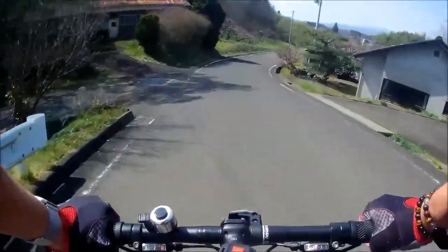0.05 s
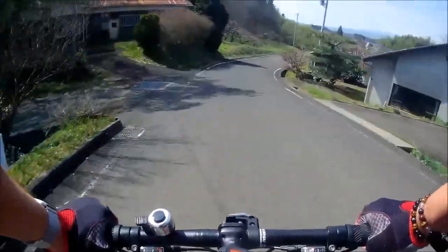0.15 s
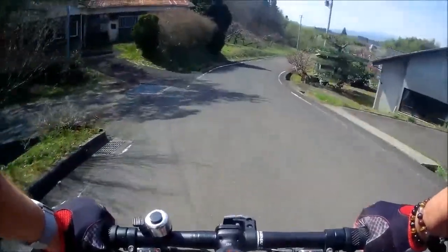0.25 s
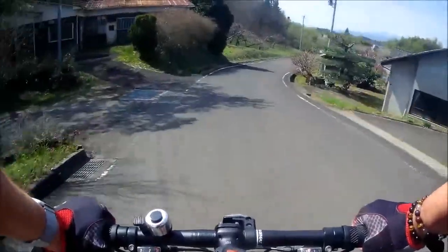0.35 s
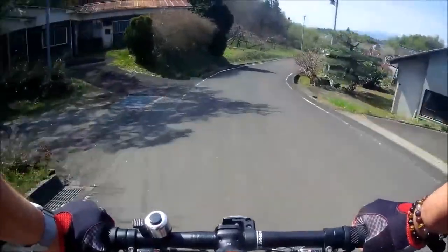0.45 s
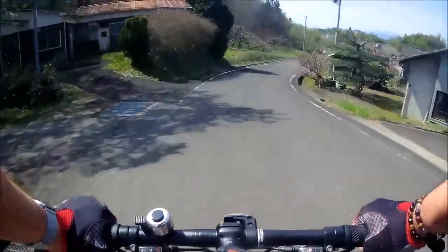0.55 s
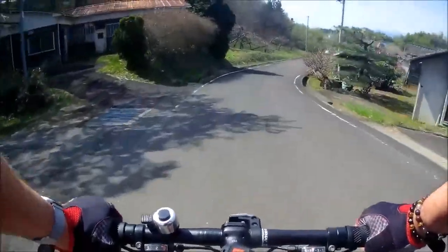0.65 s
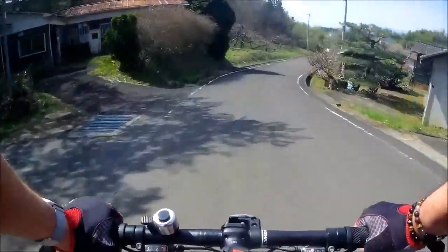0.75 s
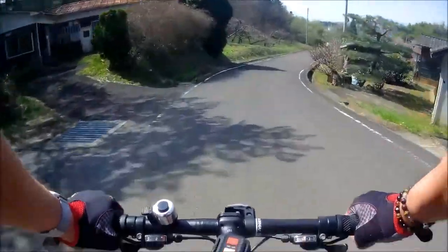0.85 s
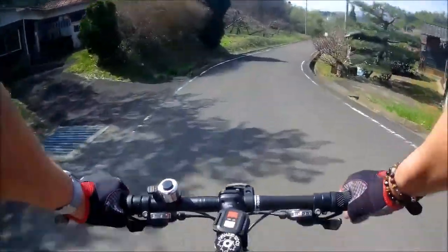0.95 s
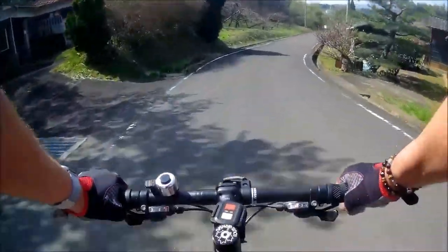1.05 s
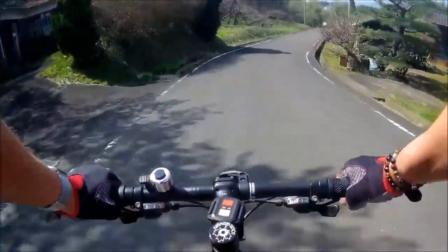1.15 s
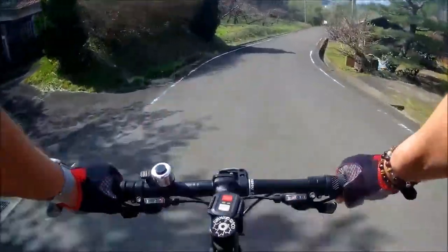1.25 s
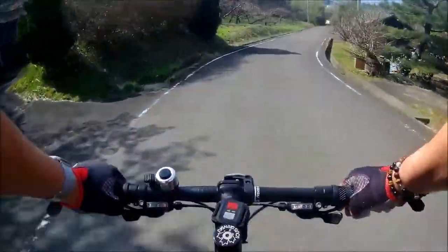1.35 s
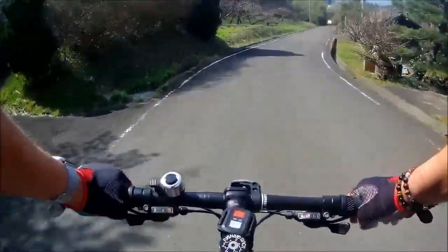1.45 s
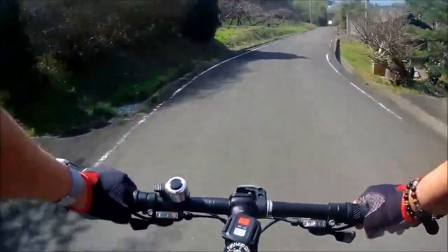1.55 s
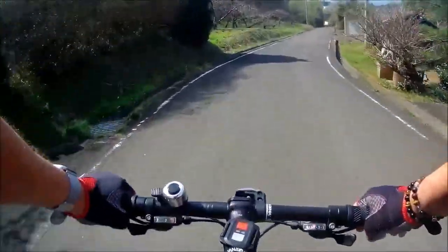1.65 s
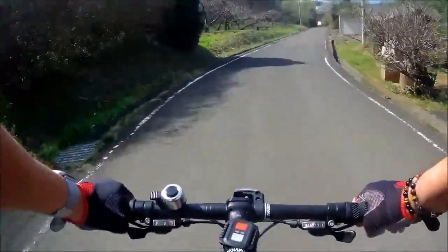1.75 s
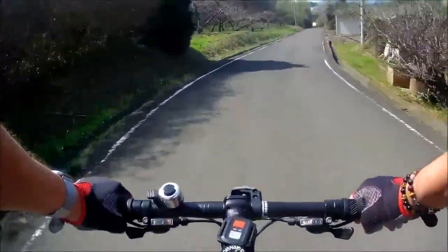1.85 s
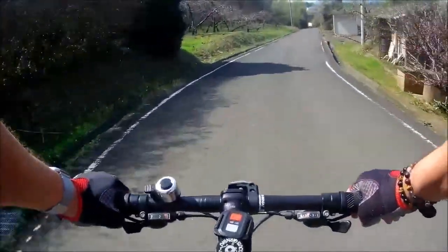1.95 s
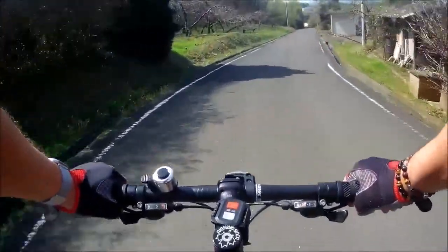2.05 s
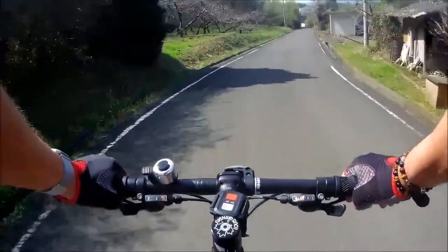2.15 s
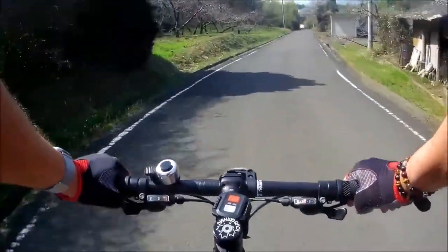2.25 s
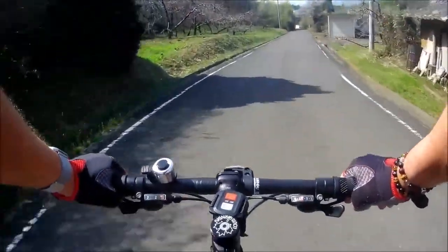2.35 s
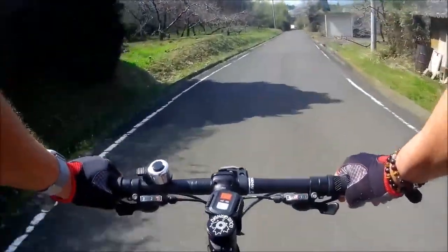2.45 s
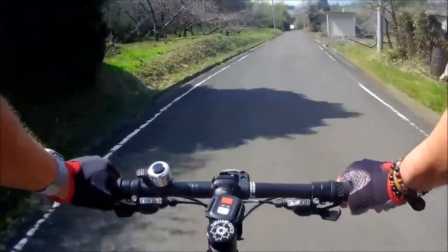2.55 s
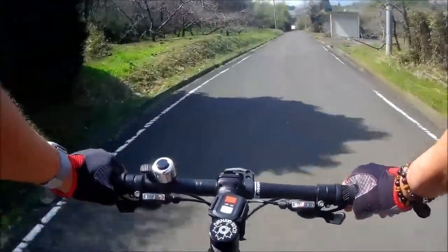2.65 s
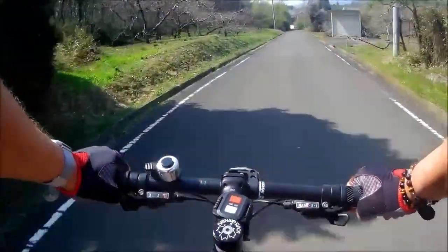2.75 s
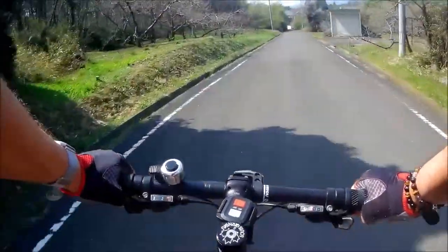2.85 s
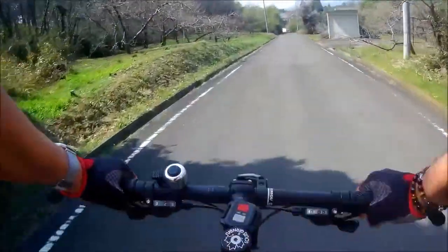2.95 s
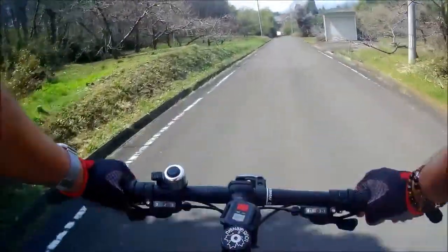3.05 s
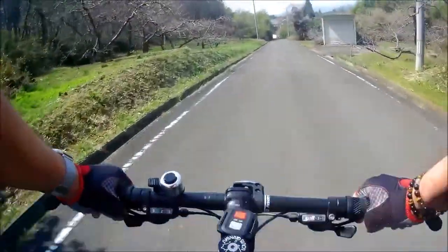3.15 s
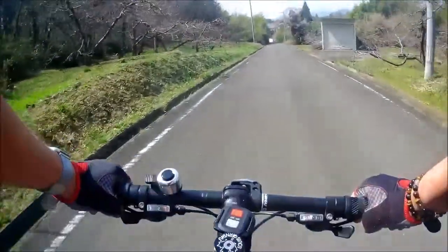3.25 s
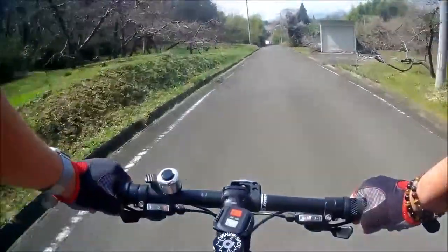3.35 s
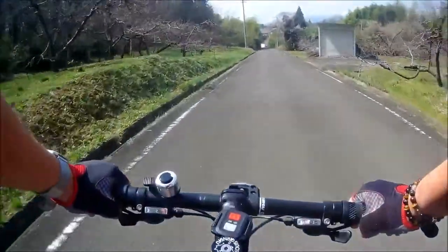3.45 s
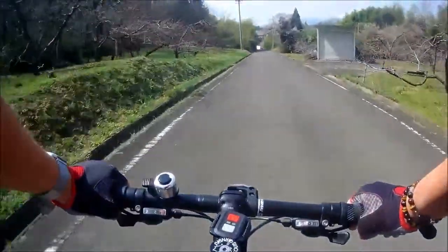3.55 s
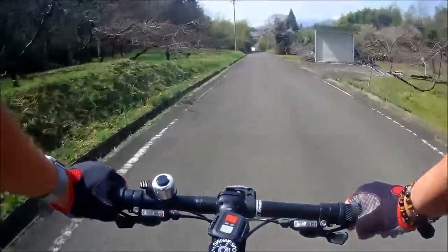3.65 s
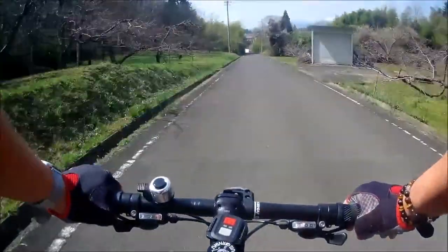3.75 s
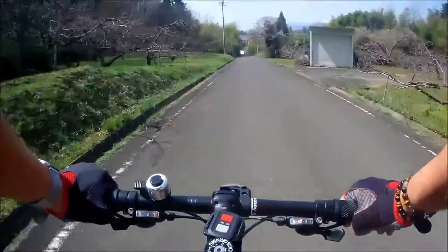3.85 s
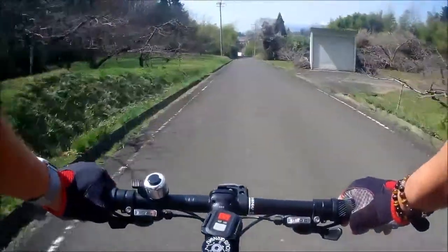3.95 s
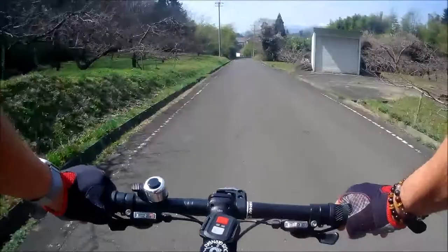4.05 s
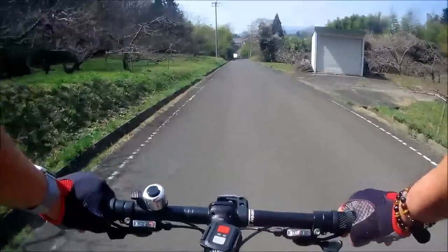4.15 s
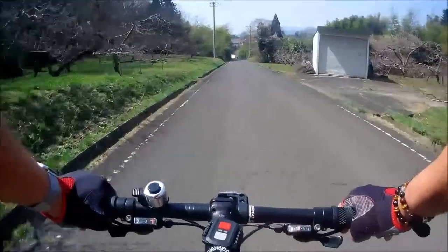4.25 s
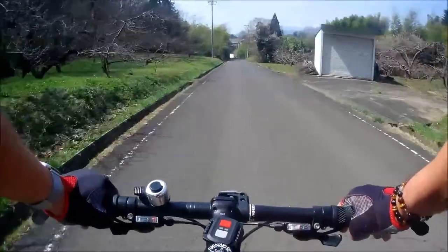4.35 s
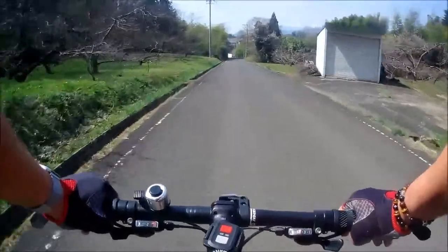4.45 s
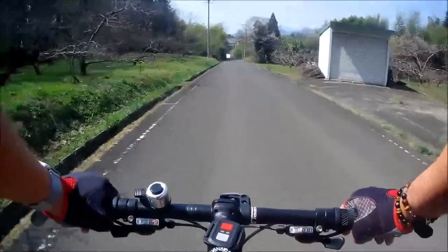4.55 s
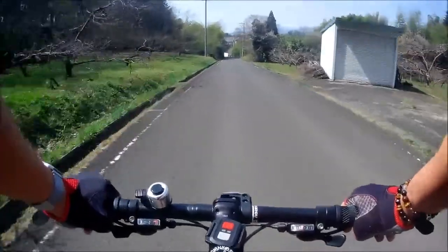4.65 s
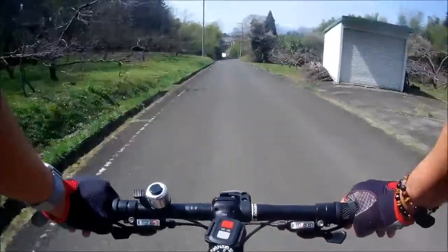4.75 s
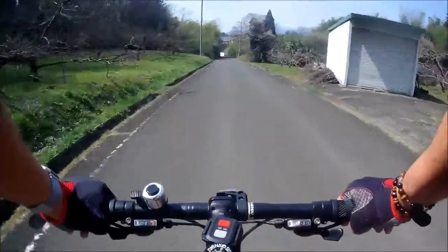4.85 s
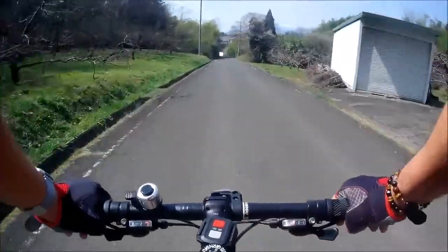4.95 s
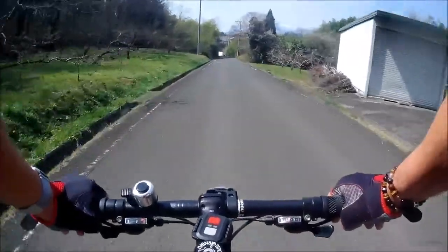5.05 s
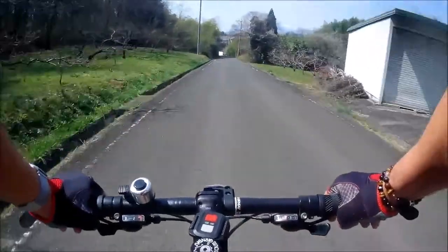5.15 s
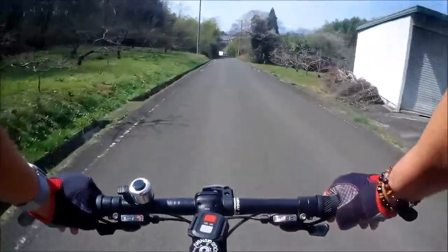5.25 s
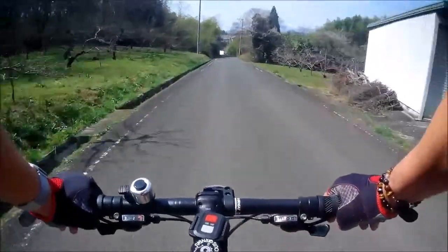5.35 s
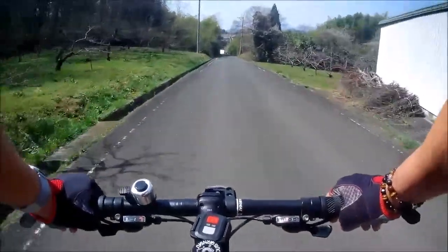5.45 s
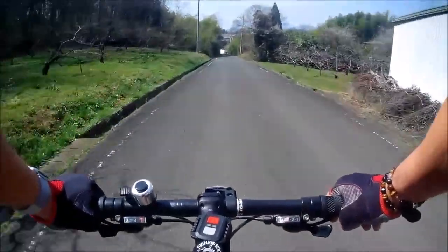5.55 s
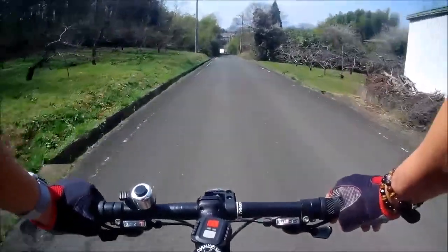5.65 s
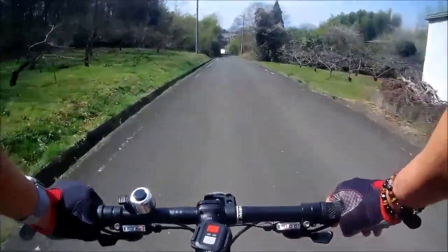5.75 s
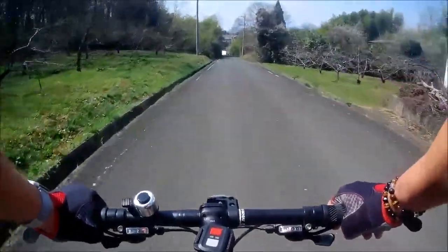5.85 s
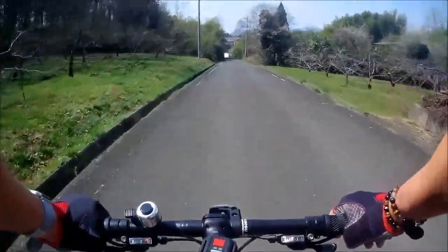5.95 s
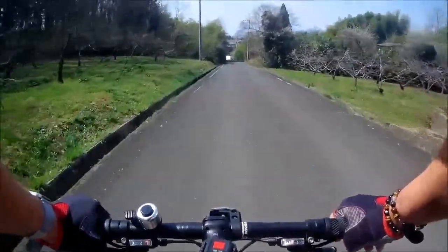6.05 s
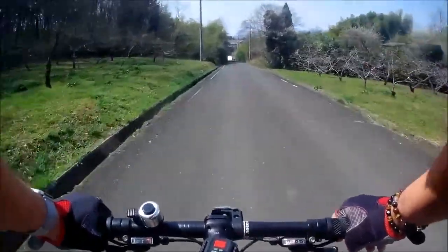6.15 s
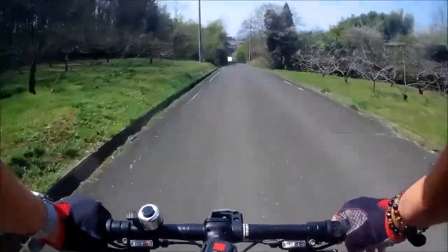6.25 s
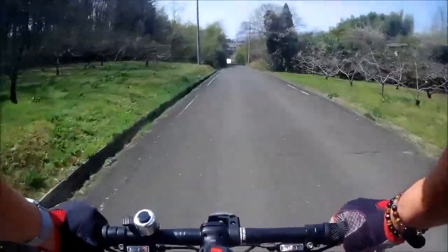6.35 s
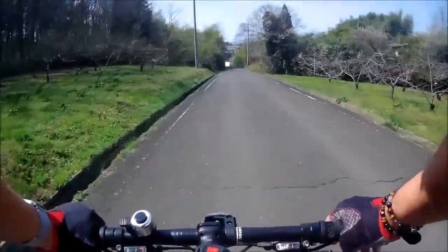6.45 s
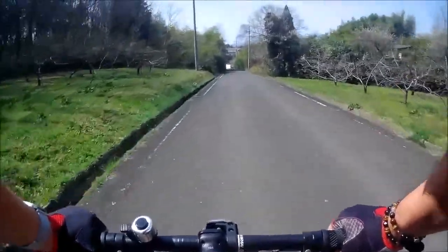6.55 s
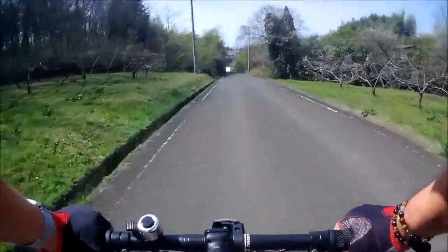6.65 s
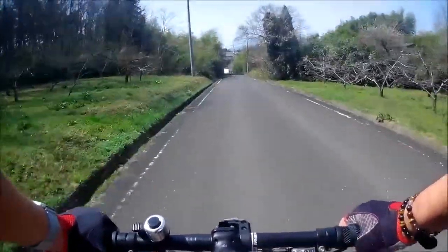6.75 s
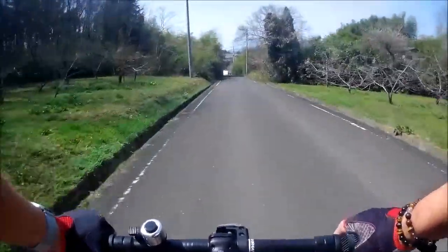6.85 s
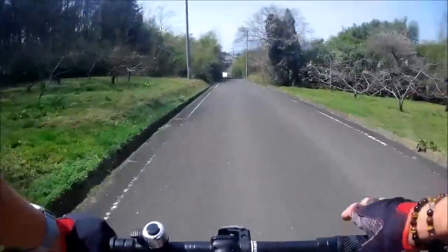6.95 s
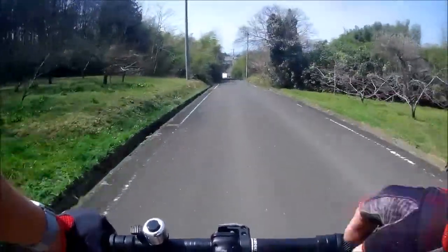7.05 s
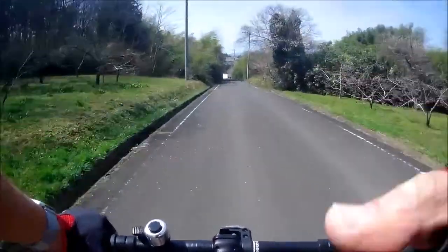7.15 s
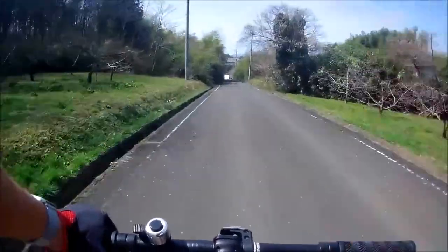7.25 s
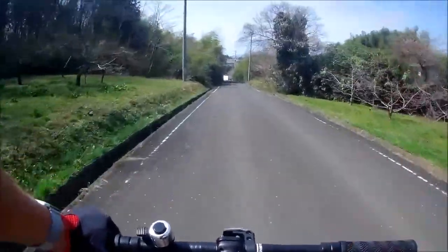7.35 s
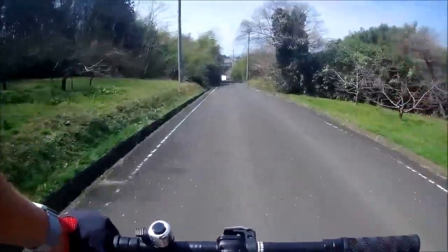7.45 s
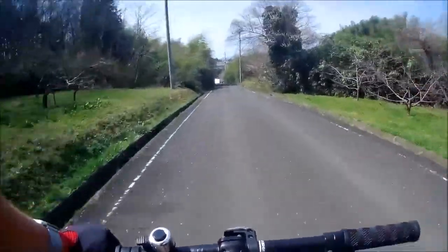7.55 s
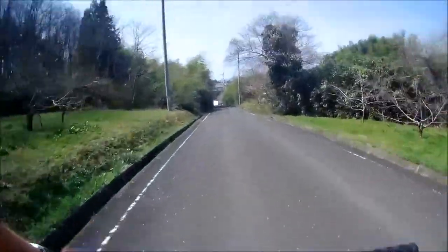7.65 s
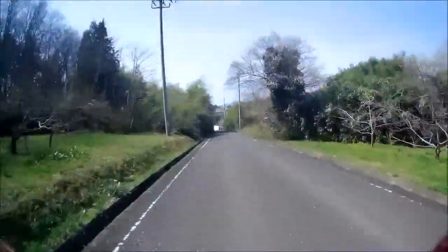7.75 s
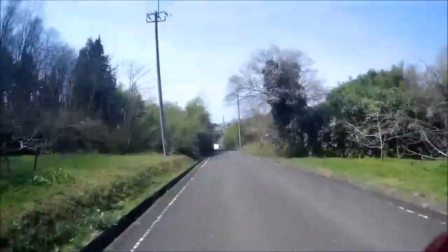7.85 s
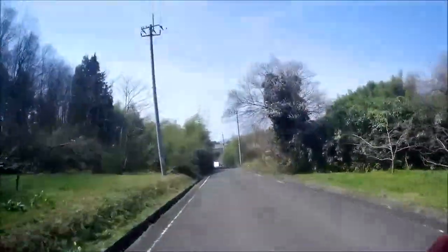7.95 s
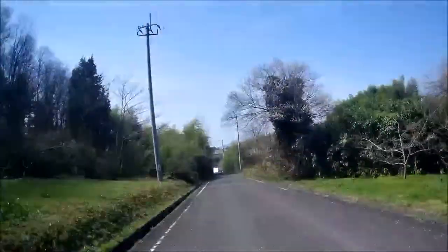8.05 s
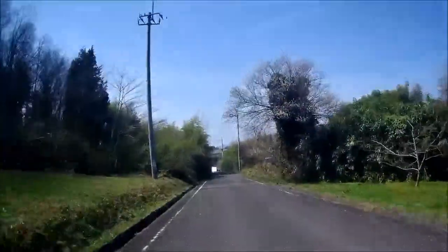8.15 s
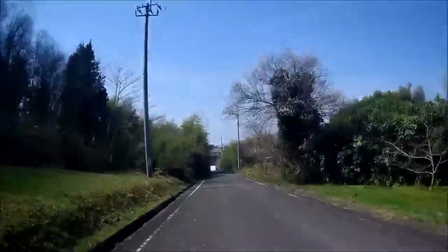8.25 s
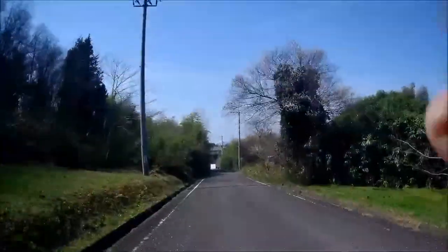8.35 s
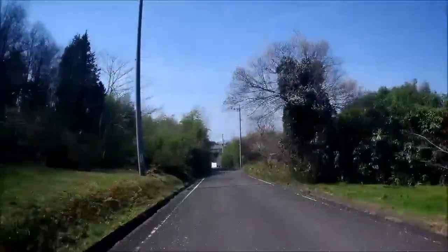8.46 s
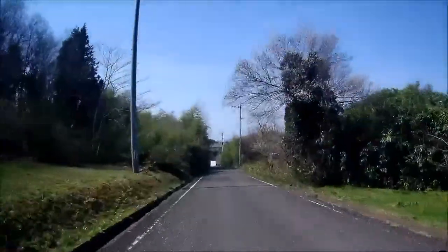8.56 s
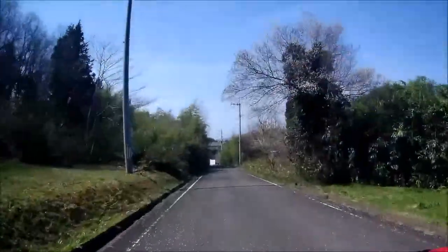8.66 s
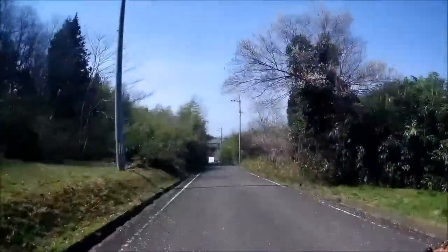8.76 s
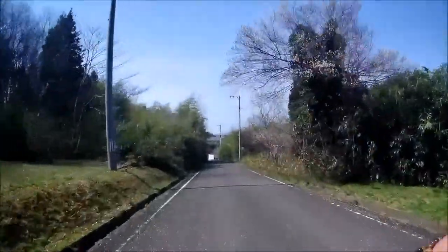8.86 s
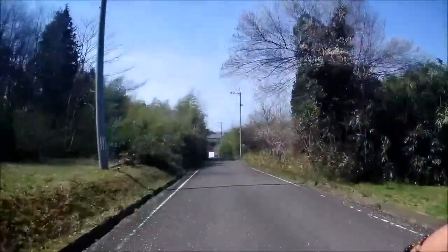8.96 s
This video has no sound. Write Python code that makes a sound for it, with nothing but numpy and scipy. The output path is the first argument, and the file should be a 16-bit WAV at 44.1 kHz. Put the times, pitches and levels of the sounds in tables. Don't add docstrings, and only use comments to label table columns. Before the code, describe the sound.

A bicycle rolls over a paved country road, heard from a chest-mounted microphone shut in a plastic case. From the start there is a soft lumpy rumble, a hollow boxy hum and a bright chain buzz from pedalling, easing after about 0.7 s. A sharp metallic tick snaps at 0.37 s, with fainter ticks until 2.3 s. Wind rumble and road shake grow from 2 s, fluctuating strongest around 4 to 6.5 s, with small dull bumps near 5.5 and 5.9 s. At 7.24 s a gloved hand hits the case: very loud, dry cracks, low thumps and plastic rattles cluster until 7.7 s, mixed with cloth rubbing that fades by 7.85 s. A soft rub leads to another hard double knock at 8.08-8.11 s, with a short thin ring. Rolling and slight chain buzz continue to 9 s, treble briefly dulling at times.

```python
import sys
import numpy as np
from scipy import signal
from scipy.fft import rfft, irfft, next_fast_len
from scipy.io import wavfile
from scipy.ndimage import uniform_filter1d

SR = 44100
rng = np.random.default_rng(int(sys.argv[2]) if len(sys.argv) > 2 else 0)


def waveform_to_disk(signal):
    frames = np.transpose(np.atleast_2d(signal))
    scaled = np.clip(frames, -1, 1) * 32767
    samples = np.round(scaled).astype(np.int16)
    wavfile.write(sys.argv[1], SR, samples)


def voltage_ratio(level):
    return 10 ** (np.asarray(level, float) / 20)


N = 396459


def rms_one(x):
    return x / np.sqrt(np.mean(x ** 2) + 1e-20)


def butter(x, hz, kind):
    return signal.sosfilt(signal.butter(2, hz, kind, fs=SR, output="sos"), x)


def in_time(rows):
    s, *columns = np.transpose(rows)
    return [np.interp(np.arange(N) / SR, s, column) for column in columns]


def drift(rate_hz):
    r = np.exp(-80 * np.pi * rate_hz / SR)
    noise = rng.standard_normal(N // 40 + 1002)
    slow = signal.lfilter([1], [1, -2 * r, r * r], noise)[1000:]
    return np.interp(np.arange(N) / 40, np.arange(len(slow)), rms_one(slow))


def grit(per_s, spread_db, share):
    smooth = rng.standard_normal(N)
    sizes = voltage_ratio(spread_db * np.minimum(rng.exponential(1, N), 3)) * np.sign(smooth)
    clicks = rms_one(sizes * (rng.random(N) < per_s / SR))
    share = np.clip(share, 0, 1)
    return np.sqrt(1 - share) * smooth + np.sqrt(share) * clicks


def coloured(x, spectrum):
    size = next_fast_len(N)
    hz = np.maximum(np.arange(size // 2 + 1) * SR / size, 1)
    at, level_db = np.transpose(spectrum)
    gain = voltage_ratio(np.interp(np.log(hz), np.log(at), level_db))
    return rms_one(irfft(rfft(x, size) * gain, size)[:N])


def resonance(x, hz, width_hz):
    r = np.exp(-np.pi * width_hz / SR)
    poles = [1, -2 * r * np.cos(2 * np.pi * hz / SR), r * r]
    return signal.lfilter([(1 - r * r) / 2, 0, (r * r - 1) / 2], poles, x)


def case(x, modes):
    return rms_one(sum((-1) ** k * voltage_ratio(level_db) * resonance(x, hz, width_hz)
                       for k, (hz, width_hz, level_db) in enumerate(modes)))


def struck(hz, t60_s, rise_s):
    t = np.arange(SR * 6 // 100) / SR
    wave = np.sin(2 * np.pi * hz * t) * voltage_ratio(-60 * t / t60_s) * (1 - np.exp(-t / rise_s))
    return wave / np.abs(wave).max()


def add(out, s, sound):
    i = round(s * SR)
    out[i:i + len(sound)] += sound[:N - i]


# f/Hz, level/dB per Hz
RUMBLE = [(12, -52), (20, -7), (60, -6.5), (200, -8), (440, -13.5), (600, -18.5), (1170, -18), (1980, -120)]


def bass_rumble(wind_db, gust):
    lumps = voltage_ratio(0.64 * gust + 0.43 * drift(8.9))
    rumble = coloured(grit(110.0, 0.84, 0.25) * lumps, RUMBLE)
    drum = rms_one(resonance(rumble, hz=134, width_hz=107))
    swell_db = wind_db + 44
    return voltage_ratio(-46.5 + 0.49 * swell_db) * rumble + voltage_ratio(-49 + 2.06 * swell_db) * drum


# f/Hz, width/Hz, level/dB
CASE_LOW = [(579.6, 57, -5), (1090, 184, -2), (1292, 111.5, 4), (1697, 187, -8.5), (2050, 327, -12.5)]


def case_hum(shake_db, gust):
    shake = case(grit(900.0, 2.2, 0.28) * voltage_ratio(0.093 * gust + 0.54 * drift(26.0)), CASE_LOW)
    return voltage_ratio(shake_db + 0.32) * rms_one(butter(shake, 2400.0, "low"))


# t/s, length/s, extra buzz/dB, extra sizzle/dB
PEDALLING = [
    (-.2, 0.89, 7.5, 15),
    (5.9, 0.87, 0, 2),
    (8.3, .8, 3.5, 3.5),
]
# f/Hz, width/Hz, level/dB
CASE_HIGH = [(2940, 190, 2.5), (3300, 240, 2), (3760, 133, 1), (4200, 570, -10)]
# f/Hz, width/Hz, level/dB
CASE_TOP = [(4780, 500, -5), (5400, 230, 2), (6080, 490, -10)]


def chain_buzz(shake_db):
    swing_db = shake_db + 42.5
    buzz_db = -59.5 + 0.88 * swing_db
    sizzle_db = -71 + 1.46 * swing_db
    ease_s = 0.22
    for s, length_s, extra_buzz_db, extra_sizzle_db in PEDALLING:
        end_s = s + length_s
        load, = in_time([(s, 0), (s + ease_s, 1), (end_s, 1), (end_s + ease_s, 0)])
        buzz_db = buzz_db + extra_buzz_db * load
        sizzle_db = sizzle_db + extra_sizzle_db * load
    links = grit(1500.0, 2.6, 0.21) * voltage_ratio(1.3 * drift(25.0))
    whirr_hz, whirr_width_hz = 2170, 250
    whirr = rms_one(resonance(resonance(links, whirr_hz, whirr_width_hz), whirr_hz, whirr_width_hz))
    buzz = rms_one(butter(case(links, CASE_HIGH), [2800.0, 4800.0], "band"))
    sizzle = rms_one(butter(case(links, CASE_TOP), [4700.0, 6200.0], "band"))
    return voltage_ratio(buzz_db - 7.5) * whirr + voltage_ratio(buzz_db + 0.4) * buzz + voltage_ratio(sizzle_db + 1.0) * sizzle


# t/s, wind buffeting level/dB, road shake level/dB
RIDE = [(0.0, -48.5, -44.5), (0.62, -50.5, -45.5), (1.03, -50, -47.5), (1.45, -49.5, -44.5),
        (2.0, -46, -44), (2.76, -43.5, -44), (3.37, -44, -45), (4.08, -41.5, -40.5), (4.3, -43.5, -42.5),
        (4.8, -42, -41.5), (5.19, -43.5, -42.5), (5.62, -41.5, -41.5), (5.87, -42.5, -42),
        (6.2, -41.5, -40), (6.5, -41.5, -41), (7.0, -45.5, -41.5), (8.2, -43, -43.5), (8.99, -47, -42.5)]


def ride():
    wind_db, shake_db = in_time(RIDE)
    gust = drift(5.4)
    return bass_rumble(wind_db, gust) + case_hum(shake_db, gust) + chain_buzz(shake_db)


# t/s, peak level/dB, f/Hz
TICKS = [(0.3731, -18, 3610), (0.382, -35, 3070), (.453, -45, 3720), (.76, -38, 5500), (0.7606, -39, 3300),
         (.788, -49, 3100), (1.27, -53, 3680), (1.376, -54, 3130), (1.4728, -51, 3240), (1.821, -47, 3360),
         (1.845, -50, 3140), (1.906, -55, 3210), (2.302, -45, 3300), (2.3025, -54, 4300),
         (2.303, -50, 5330)]
# t/s, peak level/dB, f/Hz, t60/s
SPOKE_PING = (1.8204, -36, 3400, .022)


def chain_ticks():
    out = np.zeros(N)
    for s, peak_db, hz in TICKS:
        ping = struck(hz, 0.0046, 0.00072)
        jolt = rng.standard_normal(len(ping)) * voltage_ratio(-60 * np.arange(len(ping)) / SR / 0.013)
        body = case(jolt, CASE_HIGH + CASE_TOP)
        add(out, s, voltage_ratio(peak_db + 7.0) * ping + voltage_ratio(peak_db - 4.5) * body / np.abs(body).max())
        add(out, s, voltage_ratio(peak_db - 12.0) * struck(1360.0, 0.039, 0.00075))
    s, peak_db, hz, t60_s = SPOKE_PING
    add(out, s, voltage_ratio(peak_db) * struck(hz, t60_s, 0.0018))
    return out


def crack(hz, t60_s, noise_share, low_hz):
    ping = struck(hz, t60_s, 0.00041)
    burst = rng.standard_normal(len(ping)) * voltage_ratio(-60 * np.arange(len(ping)) / SR / t60_s)
    wave = ping + noise_share * butter(burst, [low_hz, 6800.0], "band")
    return wave / np.abs(wave).max()


# t/s, crack level/dB, crack f/Hz, ring level/dB, ring f/Hz
KNOCKS = [(7.2371, -5, 3700, -16, 1510), (7.263, -11, 4600, -11.5, 1160), (7.337, -18, 3240, -20, 1300),
          (7.3897, -18, 3300, -18, 1170), (7.4332, -19, 4930, -36, 1260), (7.4555, -18, 4560, -30, 1340),
          (7.474, -5, 4570, -22, 1260), (7.54, -22, 3670, -24, 1090), (7.563, -37, 2930, -23, 1170),
          (7.596, -22, 4400, -23.5, 1180), (7.619, -40, 3200, -28, 1190), (7.6508, -37, 2940, -23, 533),
          (7.691, -38, 3070, -32, 1130), (8.0831, -5.5, 3760, -19.5, 1260), (8.099, -26, 4600, -42, 1140),
          (8.1138, -12.5, 3660, -22, 1670), (8.122, -31, 2600, -26.5, 1650)]
# t/s, peak level/dB, f/Hz, t60/s
LATCH = [
    (7.239, -25, 3700, 0.039),
    (7.239, -24.5, 2000, .025),
    (8.118, -32.5, 2580, 0.079),
    (8.119, -36, 3050, .07),
    (8.117, -41, 3520, .06),
    (8.119, -37, 4050, 0.11),
    (8.118, -38, 6300, 0.083),
    (8.119, -52, 10700, 0.11),
]
# t/s, peak level/dB, f/Hz, t60/s
PUSHES = [(7.2605, -4, 148, .026), (7.389, -11, 170, .018), (7.477, -15, 115, .025),
          (7.476, -17, 360, .015), (7.455, -28, 150, .02), (8.0836, -5, 800, .004), (8.0812, -24, 900, .01),
          (7.2445, -19, 330, .02), (1.99, -28, 180, .04), (5.466, -25, 170, .03), (5.495, -27, 170, .03),
          (5.91, -29, 260, .03), (.52, -31, 1200, .02)]
# t/s, peak level/dB, f/Hz, t60/s
PULLS = [
    (7.238, -15, 85, .035),
    (7.341, -20, 140, .02),
    (8.087, -13, 105, .025),
    (8.0995, -14, 300, .008),
    (7.541, -24, 260, .02),
]


def knocks():
    out = np.zeros(N)
    for s, crack_db, crack_hz, ring_db, ring_hz in KNOCKS:
        add(out, s, voltage_ratio(crack_db - 5.5) * crack(crack_hz, 0.007, noise_share=1.25, low_hz=1720.0))
        add(out, s, voltage_ratio(ring_db + 6.5) * struck(ring_hz, 0.0094, 0.00062))
        add(out, s, voltage_ratio(ring_db + 2.0) * struck(620.0, 0.0076, 0.00046))
    for s, peak_db, hz, t60_s in LATCH:
        add(out, s, voltage_ratio(peak_db) * struck(hz, t60_s, 0.0023))
    for swings, sign in ((PUSHES, 1), (PULLS, -1)):
        for s, peak_db, hz, t60_s in swings:
            add(out, s, sign * voltage_ratio(peak_db) * struck(hz, t60_s, 0.22 / hz))
    return out


# t/s, length/s, starting pressure level/dB, swell over the stroke/dB, brightness/dB
RUB = [(7.24, 0.03, -22.5, -19, -4), (7.275, 0.0555, -41.5, 4, -3), (7.332, 0.02, -21, -19, -7),
       (7.354, 0.0347, -42, 12, -10.5), (7.412, 0.052, -57, 4, 2.5), (7.494, 0.043, -45, 1, -12),
       (7.534, 0.055, -32.5, -3, -9), (7.606, 0.048, -40, 1.5, -14.5), (7.66, 0.104, -37.5, 2.5, -15),
       (7.768, 0.087, -34.5, 0.5, -17), (7.982, 0.12, -53.5, 13, -10.5), (8.101, 0.011, -40, 4, -6),
       (8.111, 0.064, -39.5, -10, -3.5)]
# f/Hz, level/dB per Hz
SCRUB = [(150, -28), (361, 12), (533, -0.5), (655, 7.5), (1210, 16.5), (1830, -48), (2000, -60)]
# f/Hz, level/dB per Hz
SCRATCH = [(2400, -22), (2750, -12), (3200, -4.5), (3750, -5), (4600, -7), (5250, -9), (5700, -16),
           (15500, -40)]
# f/Hz, level/dB per Hz
RASP = [(1800, -4), (2400, -3), (5500, -4), (6500, -1), (8600, -14), (11000, -12), (15500, -29)]


def rubbing():
    slips = grit(3000.0, 0.66, 0.13) * voltage_ratio(1.4 * drift(66.0))
    dull, bright, sharp = np.zeros((3, N))
    skids = [(s, 0.045, ring_db - 7.5, -60, -15.5) for s, _, _, ring_db, _ in KNOCKS]
    for s, length_s, pressure_db, swell_db, bright_db in RUB + skids:
        stroke = voltage_ratio(pressure_db + swell_db * np.linspace(0, 1, round(length_s * SR)))
        add(dull, s, stroke)
        add(bright, s, voltage_ratio(bright_db) * stroke)
        add(sharp, s, voltage_ratio(1.5 * bright_db) * stroke)
    dull, bright, sharp = uniform_filter1d([dull, bright, sharp], size=SR // 300, axis=1)
    wall = voltage_ratio(1) * coloured(slips, SCRUB) + voltage_ratio(1) * case(slips, CASE_LOW)
    scratch = voltage_ratio(0.6) * coloured(slips, SCRATCH)
    rasp = voltage_ratio(-4.5) * butter(coloured(slips, RASP), 1500.0, "high")
    return dull * wall + bright * scratch + sharp * rasp


def scene():
    return (ride() + chain_ticks() + knocks() + rubbing())[None]


# f/Hz, share/0-1
HOLES = [(7500, 0), (9000, 0.04), (11000, .05), (13000, 0.2), (15500, .3)]


def punch_holes(x):
    hz, _, frames = signal.stft(x, SR, nperseg=1536)
    band, frame = np.arange(len(hz)) // 9, np.arange(frames.shape[1])
    bands = band[-1] + 1
    spell = (frame + rng.integers(0, 3, (bands, 1))[band]) // 3
    luck = rng.random((bands, spell.max() + 1))[band[:, None], spell]
    empty = luck < np.interp(hz, *np.transpose(HOLES))[:, None]
    return signal.istft(frames * ~empty, SR, nperseg=1536)[1][:N]


# t/s, kept below f/Hz
STARVED = [(0.524, 5860), (0.697, 5700), (0.909, 4200), (1.066, 3820), (1.509, 3640), (1.872, 3600),
           (2.34, 3640), (2.702, 4700), (3.918, 4100), (4.11, 4500), (4.515, 4050), (4.56, 5370),
           (4.921, 7200), (5.178, 4500), (5.475, 5830), (5.624, 4000), (5.967, 4600), (6.117, 5900),
           (6.245, 5230), (6.436, 5740), (6.736, 4160), (6.842, 5400), (6.97, 4500), (7.209, 4200),
           (7.42, 6700), (7.673, 5570), (7.78, 5700), (8.782, 5740), (8.953, 4700)]
# t/s, length/s, kept below f/Hz, loss/dB
LONG_DROPOUTS = [
    (.359, .037, 7700, -23),
    (.741, .041, 8600, -30),
    (6.186, .032, 4200, -30),
    (6.545, .036, 3930, -30),
    (7.225, .143, 8700, -42),
    (7.42, .08, 8700, -40),
    (8.066, .045, 8700, -40),
    (8.126, .016, 4200, -10),
    (8.184, .042, 5300, -30),
]


def starve(x):
    out, margin = x.copy(), SR // 50
    frame_s = 0.028
    singles = [(s - frame_s / 10, frame_s, hz, -11) for s, hz in STARVED]
    for s, length_s, kept_hz, loss_db in singles + LONG_DROPOUTS:
        i, size = round(s * SR), round(length_s * SR)
        part = out[i - margin:i + size + margin]
        steep = signal.cheby1(10, 0.05, kept_hz, "high", fs=SR, output="sos")
        treble = signal.sosfiltfilt(steep, part)
        fade = signal.windows.tukey(size, min(1, 0.018 / length_s)) * (1 - voltage_ratio(loss_db - 3.0))
        out[i:i + size] -= (treble[margin:margin + size] * fade)[:N - i]
    return out


def low_pass(x):
    return signal.sosfilt(signal.butter(12, 15790, fs=SR, output="sos"), x)


# f/Hz, level/dB per Hz
HISS = [(1000, 10.5), (4000, 4), (7000, 2), (10000, 0), (14600, -1), (15200, -4), (15800, -12)]


def record(dry):
    hiss = voltage_ratio(-60.5) * coloured(rng.standard_normal(N), HISS)
    clipped = np.clip(dry[0] + hiss, -0.9, 0.9)
    mix = starve(punch_holes(clipped))[None]
    return low_pass(mix)


dry = scene()
out = record(dry)
waveform_to_disk(out)
```